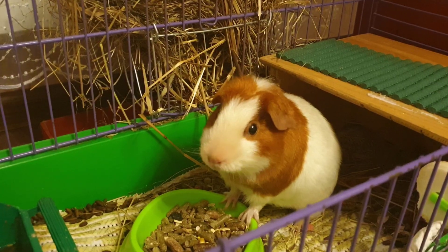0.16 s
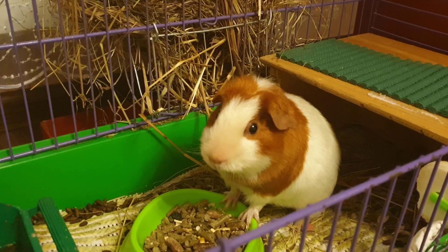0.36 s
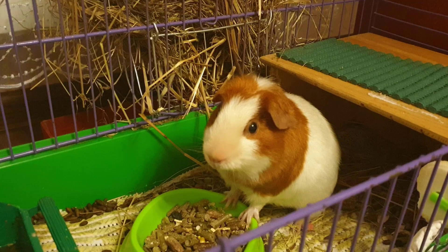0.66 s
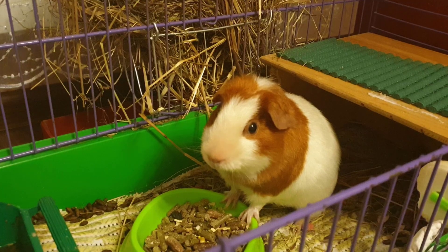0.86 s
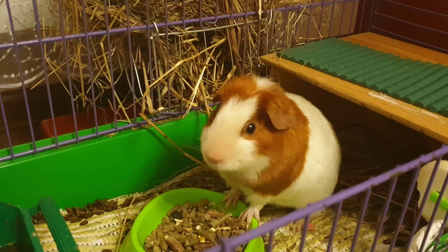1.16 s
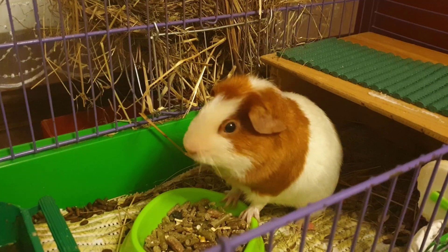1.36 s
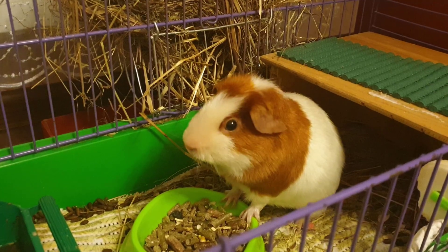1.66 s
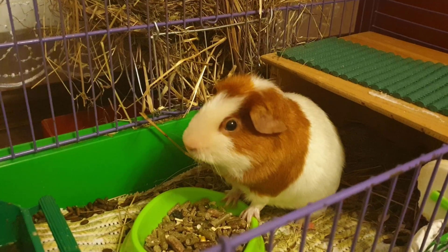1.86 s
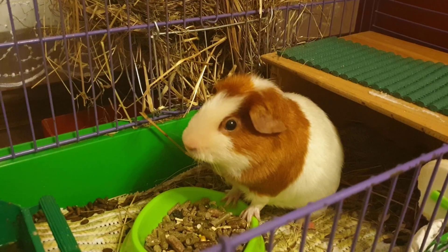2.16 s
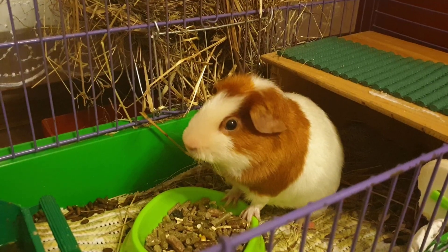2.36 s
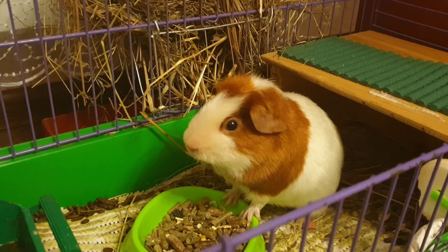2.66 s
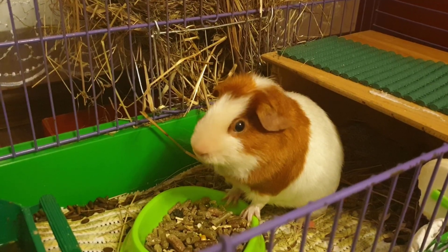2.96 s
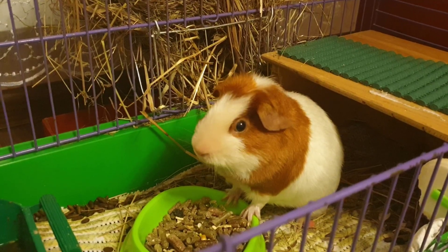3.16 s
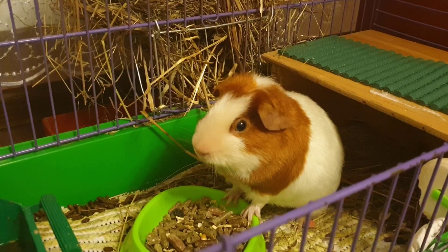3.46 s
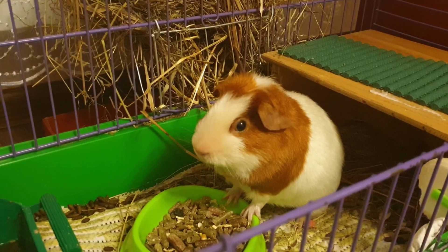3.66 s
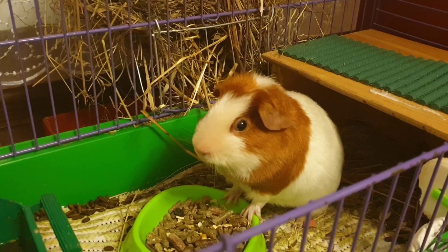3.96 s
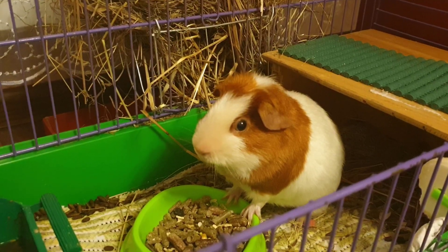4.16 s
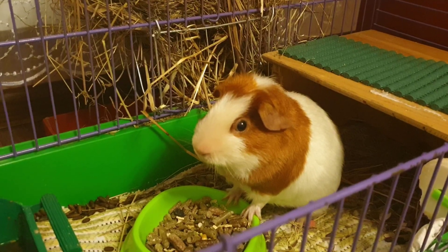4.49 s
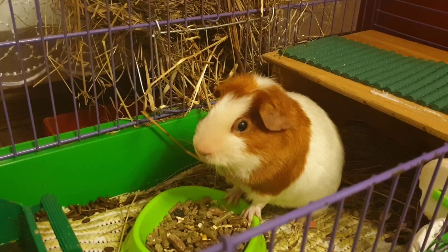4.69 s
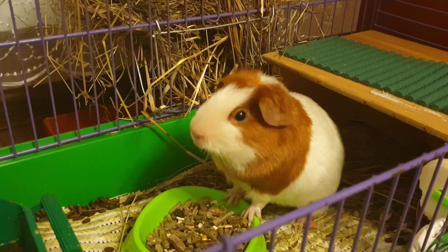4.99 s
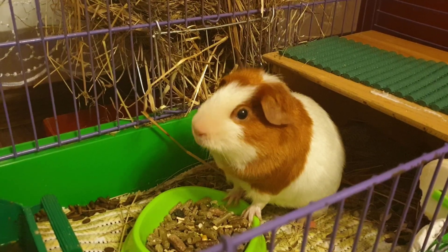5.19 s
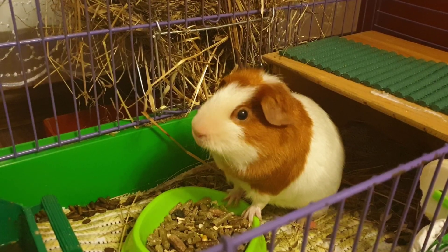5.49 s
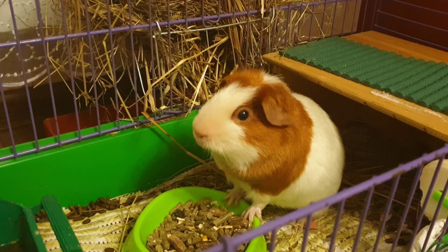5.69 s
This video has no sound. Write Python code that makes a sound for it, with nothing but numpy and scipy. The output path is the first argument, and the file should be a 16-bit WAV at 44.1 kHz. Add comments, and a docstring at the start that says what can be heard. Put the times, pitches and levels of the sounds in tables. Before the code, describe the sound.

Rapid guinea pig squeaks come roughly every half second, starting mid-call. Each leaps upward from hum to bright yelp; the early ones climb high and whistle, several later ones are clipped. Cage and room echoes briefly linger after them. Soft scratchy rubbing, like dry bedding being brushed, comes and goes throughout, with two faint hollow hoots near the end. Low room noise lies underneath, captured close in stereo.

```python
"""In a small, still room, a low rumble and a faint mains hum lie under everything; the rumble swells once, early on.
A guinea pig begs for food in its cage: thirteen wheeks in a row, the first already under way at the start.
Each wheek is a stack of sine waves: a low, nasal hum slides up, through a mouth resonance, into a high cry.
Some end in a thin whistle; echoes from cage and room, made of fading noise, let the calls linger.
All along, something dry is rubbed in uneven strokes of coloured noise, and near the end it softly hoots twice."""
import sys
import numpy as np
from scipy import signal
from scipy.fft import rfft, irfft, next_fast_len
from scipy.io import wavfile
from scipy.ndimage import uniform_filter1d, map_coordinates

SR = 44100
rng = np.random.default_rng(int(sys.argv[2]) if len(sys.argv) > 2 else 0)


def store_wav(level_fs):
    """Save 16-bit WAV to argv[1]."""
    pcm = np.round(np.clip(np.atleast_2d(level_fs), -1, 1) * 32767)
    wavfile.write(sys.argv[1], SR, pcm.T.astype(np.int16))


N = 257400
TIME = np.arange(N) / SR   # seconds

# Background noise of the still room: [f/Hz, density level/dB before the rumble is scaled as a whole]
RUMBLE_COLOUR = [(20, -9), (35, -3), (55, 1), (95, -3), (150, -8.5), (250, -15.5), (450, -20.5),
                 (1000, -24), (3000, -33), (15000, -35)]
# How alike left and right are in sounds spread through the room: [f/Hz, correlation -1 to 1]
LIKENESS = [(40, 0.88), (300, 0.65), (700, 0.14), (1400, -0.27), (2500, 0.15), (5000, 0.0036),
            (15000, 0.062)]
# A wheek is a low hum that lifts, may dwell on a shelf, leaps to a loud yelp, climbs, and may end in a whistle.
# One row per wheek: [start t/s, time constant of the lift t/s,
#  (hum, shelf, yelp, climb, whistle) lengths t/s,
#  (onset, settled hum, end of lift, start of yelp, end of yelp, top of climb, ceiling of whistle) f/Hz,
#  effort in (hum, yelp, top) level/dB, extra second partial in the hum level/dB]
WHEEKS = [ (-.2, .02, (.119, 0, .04, .062, .096), (600, 570, 760, 1050, 1250, 2780, 3770), (0, 3, 2.8), 0),
          (.302, .027, (.116, 0, .033, .083, 0), (625, 504, 757, 1044, 1200, 2760, 2760), (1.2, 1.5, .5),
          -5), (.7, .025, (.129, 0, .034, .054, .05), (679, 510, 820, 1080, 1460, 2780, 3450), (0, 2.5, .5),
          -5), (1.16, .032, (.151, 0, .031, .082, .033), (614, 509, 820, 980, 1368, 2800, 3500),
          (1, 2.5, 1.5), -5.5), (1.945, .02, (.127, .06, .022, .04, 0),
          (455, 540, 680, 1052, 1110, 1780, 1780), (1.5, .5, -3.5), -3.5),
          (2.432, .04, (.158, .062, .04, .066, .032), (520, 520, 790, 1320, 1350, 2860, 3560),
          (-.5, .5, -3), -2.5), (2.982, .027, (.127, 0, .058, .036, .025),
          (627, 522, 760, 980, 1129, 2080, 2500), (-.5, 1.4, -5.5), 1),
          (3.482, .026, (.091, 0, .033, .035, 0), (567, 488, 800, 1290, 1074, 1200, 1200), (-3.5, -1, -2),
          -1), (3.912, .015, (.074, 0, .037, .014, 0), (529, 508, 790, 1199, 1196, 1255, 1255),
          (-2, -4, -4.5), -2), (4.286, .014, (.168, 0, .02, .038, 0),
          (528, 617, 840, 1140, 1272, 1700, 1700), (-.5, 1.7, -2), 0),
          (4.755, .016, (.138, 0, .037, .093, .043), (553, 600, 740, 980, 1170, 2760, 3480), (-.5, 3, 1.5),
          1.5), (5.278, .028, (.124, 0, .005, .034, .03), (590, 540, 763, 1176, 1255, 1990, 2400),
          (-1.5, .6, 1.5), 2), (5.688, .018, (.112, 0, .005, .036, 0),
          (564, 606, 872, 1112, 1222, 1686, 1686), (0, 2.1, 0), .5), ]
# The voice swells where its pitch meets a resonance:
# [pitch f/Hz, fundamental level/dB before effort, second partial re fundamental level/dB before the nasal extra]
VOICE = [(480, -50.5, -10.6), (560, -48.5, -4.7), (610, -53, 3.8), (670, -61, 1), (780, -54, -18),
         (900, -49.5, -25), (1050, -42.5, -24), (1250, -43.5, -20), (1380, -54.5, -6), (1700, -58.5, -7),
         (2100, -53.5, -24), (2600, -52, -22), (2900, -51, 4), (3020, -44.5, -1), (3130, -40.5, -15),
         (3500, -40, -19)]
# The yelp near 1100 Hz is almost pure, the climb above it buzziest:
# [pitch f/Hz, third partial re fundamental level/dB before the throat colours it]
BUZZ = [(480, -50), (600, -23.5), (800, -21.5), (1100, -44), (1400, -20), (1800, -7), (2200, -19.5),
        (3000, -24), (3500, -13.5)]
# Resonances of nose and mouth that colour the third and higher partials: [f/Hz, level/dB]
THROAT = [(1500, -2.5), (1800, -1), (2300, 0.5), (2800, -11), (4000, -3), (4800, -24), (5500, -3),
          (6100, 7.5), (7300, -22), (8200, -8), (9100, -5), (10700, -3), (14000, -6)]
# The voice is steady in the hum, unsteady and airy in the climb: [pitch f/Hz, strain 0 to 1]
STRAIN = [(600, 0), (750, .5), (1100, .2), (1500, 1), (2600, 1), (3100, .4)]
# Near echoes from the cage walls: [f/Hz, re direct sound level/dB before the direct sound's own trim]
CAGE_ECHO = [(400, -13), (1100, -15), (2000, -8), (3200, -19.5), (6000, -16), (14000, -17)]
# The room's longer answer: [f/Hz, re direct sound level/dB before the direct sound's own trim]
ROOM_ECHO = [(400, -20.5), (600, -10.5), (1100, -11.5), (2000, -3), (3200, -8), (6000, -15), (14000, -13)]
# Rubbing strokes: [peak t/s, swell by 20 dB t/s, fade by 20 dB t/s,
#  level/dB before the overall rubbing gains, weight of the hollow low part level/dB]
STROKES = [(.04, .2, .13, -62, 7), (.186, .4, .17, -57, -15), (.516, .3, .11, -49, -2),
           (.625, .2, .37, -43, 0), (.823, .16, .35, -48, 2), (1.07, .21, .32, -49.5, -13),
           (1.462, .16, .37, -55, -14), (1.681, .24, .34, -50.4, -7), (2.042, .5, .27, -64, -21),
           (2.19, .2, .14, -72, -12), (3.03, .25, .49, -60.4, -12), (3.45, .12, .9, -56.5, -7),
           (3.675, .26, .28, -50, 1), (3.866, .27, .33, -50.6, -1), (4.05, .36, .27, -45, -2),
           (4.23, .16, .58, -48.5, -3), (4.606, .27, .42, -49.6, -5), (5.151, .45, .24, -49, 4.5),
           (5.309, .07, .27, -45, -1), (5.637, .46, .8, -46.8, 1), (5.813, .47, .21, -49, 5)]
# Bright friction hiss: [f/Hz, density level/dB before scaling as a whole]
FRICTION = [(300, -32), (1000, -11.5), (2000, -4.5), (4000, -4.5), (5500, 0.5), (7100, 2), (8000, -4),
            (11000, -4.5), (13500, -8), (15500, -21.5)]
# Hollow body of the rubbed thing: [f/Hz, density level/dB before scaling as a whole]
HOLLOW = [(150, -24), (270, -12), (450, -7.5), (720, -1.5), (950, -3.5), (1500, -4), (2800, -3),
          (4500, -6.5), (8000, -32.5)]
# A stroke catches and hoots softly: [peak t/s, pitch f/Hz, bandwidth f/Hz, peak level/dB, length t/s]
HOOTS = [(5.121, 723, 90, -56, 0.019), (5.172, 680, 90, -67, 0.12)]

MAINS_HZ, MAINS_DB = 60, -78.5
RUMBLE_DB, RUMBLE_WANDER_DB, RUMBLE_WANDER_HZ = -71.2, .6, 2.5   # level; depth and rate of its slow wander
SWELL_S, SWELL_LENGTH_S, SWELL_DB = .68, .15, 6.5   # the rumble swells once
SETTLE_S, LEAP_S = .06, .021   # the hum settles; the leap from the break to the yelp
SHELF_HZ_PER_S, WHISTLE_RISE_S = 1900, .055   # the shelf slopes up; the whistle creeps up to a ceiling
ATTACK_S, RELEASE_S, PUSH_S = .022, .006, .03   # effort turns from hum to yelp PUSH_S before the break
ROOM_T60_S = 0.38   # time for the room echoes to fade by 60 dB
CUTOFF_HZ = 15650


def from_db(db):
    """Turn decibels into a gain."""
    return 10 ** (np.asarray(db) / 20)


def rms_one(x):
    """Scale a sound to an average strength (rms) of 1."""
    return x / np.sqrt(np.mean(x ** 2) + 1e-20)


def at_hz(points, hz):
    """Read a two-column table between its rows, with pitch spaced as the ear hears it (logarithmically)."""
    table = np.array(points)
    return np.interp(np.log(np.maximum(hz, 1)), np.log(table[:, 0]), table[:, 1])


def follow(rows, at):
    """Read the other columns of a table at the given values of its first column."""
    first, *columns = np.transpose(rows)
    return [np.interp(at, first, column) for column in columns]


def drift(rate_hz, size):
    """Slow random wander with spread 1: noise smoothed twice, so only slow changes remain."""
    r = np.exp(-2 * np.pi * rate_hz / SR)
    noise = rng.standard_normal(size + SR // 2)   # the extra half second lets the filter settle
    wander = signal.lfilter([1], [1, -2 * r, r * r], noise)
    return rms_one(wander)[-size:]


def stereo_noise(spectrum, size=N):
    """Coloured noise on two channels: sharing more of the middle than the side makes them more alike."""
    padded = next_fast_len(size)
    hz = np.arange(padded // 2 + 1) * SR / padded
    alike = np.clip(at_hz(LIKENESS, hz), -1, 1)
    mid, side = rfft(rng.standard_normal((2, padded))) * from_db(at_hz(spectrum, hz))
    left_right = np.sqrt(1 + alike) * mid + np.sqrt(1 - alike) * side * [[1], [-1]]
    return irfft(left_right, padded)[:, :size] / np.sqrt(2)


def still_room():
    """Low noise that wanders a little in level, with a faint mains hum as one pure tone."""
    hum = from_db(MAINS_DB) * np.sqrt(2) * np.sin(2 * np.pi * MAINS_HZ * TIME)
    swell_db = SWELL_DB * np.exp(-((TIME - SWELL_S) / SWELL_LENGTH_S) ** 2)
    wander_db = RUMBLE_WANDER_DB * drift(RUMBLE_WANDER_HZ, N)
    rumble = from_db(RUMBLE_DB + swell_db + wander_db) * rms_one(stereo_noise(RUMBLE_COLOUR))
    return rumble + hum


def wheek_pitch(t, lengths_s, lift_s, pitches_hz):
    """The hum settles and lifts ever faster; shelf, leap, yelp and climb then glide up to the whistle."""
    onset, settled, lifted, yelp, yelp_end, top, ceiling = pitches_hz
    ends = np.cumsum(lengths_s)
    hum = settled + (onset - settled) * np.exp(-t / SETTLE_S)
    lift = np.expm1(np.minimum(t, ends[0]) / lift_s) / np.expm1(ends[0] / lift_s)   # from 0 to 1
    shelf_end = lifted + SHELF_HZ_PER_S * lengths_s[1]
    glide = np.exp(np.interp(t, ends, np.log([lifted, shelf_end, yelp, yelp_end, top])))
    creep = (ceiling - top) * (1 - np.exp(-np.maximum(t - ends[-1], 0) / WHISTLE_RISE_S))
    return np.where(t < ends[0], hum + (lifted - hum) * lift, glide + creep)


def wheek(pitch, effort_db, nasal_db, jitter=0.004, waver=0.01, shimmer_db=1.0, strain_db=1.6, air_db=-24,
          upper_step_db=-5, rasp_db=2.0, frail_db=-20, count=5):
    """One call: partials at multiples of a sliding, slightly unsteady pitch; the upper ones flutter."""
    size = len(pitch)
    t = np.arange(size) / SR
    strain, = follow(STRAIN, pitch)
    unsteady = 1 + (jitter + waver * strain) * drift(110, size)
    pitch = uniform_filter1d(pitch, size=300) * unsteady   # smoothing rounds the corners of the glide
    level_db, second_db = follow(VOICE, pitch)
    level_db = level_db + effort_db
    second_db = second_db + nasal_db
    phase = 2 * np.pi * np.cumsum(pitch) / SR
    # the second partial is steady where it is strong and breaks up where it is weak
    frailty = np.clip(second_db / frail_db, 0, 1)
    dropout_db = 2 * rasp_db * frailty * np.abs(drift(45, size))
    tone = np.sin(phase) + from_db(second_db - dropout_db) * np.sin(2 * phase)
    for k in range(3, count + 1):
        partial_db = at_hz(BUZZ, pitch) + upper_step_db * (k - 3) + at_hz(THROAT, k * pitch)
        tone += from_db(partial_db + rasp_db * drift(45, size)) * np.sin(k * phase)
    voiced = np.clip(np.minimum(t / ATTACK_S, (t[-1] - t) / RELEASE_S), 0, 1)
    air = from_db(air_db) * strain ** 2 * rng.standard_normal(size)
    flicker_db = (shimmer_db + strain_db * strain) * drift(90, size)
    return (np.sqrt(2) * tone + air) * voiced * from_db(level_db + flicker_db)


def guinea_pig():
    """All the calls in a row; how hard the animal pushes changes from stage to stage."""
    out = np.zeros(N)
    for start, lift_s, stages_s, pitches_hz, efforts_db, nasal_db in WHEEKS:
        hum_s, shelf_s, yelp_s, climb_s, whistle_s = stages_s
        hum_db, yelp_db, top_db = efforts_db
        lengths_s = [hum_s, shelf_s, LEAP_S, yelp_s, climb_s]
        # the times when the break, yelp and climb begin and when the top is reached
        breaks, yelps, climbs, tops = np.cumsum(lengths_s)[1:]
        t = np.arange(int((tops + whistle_s) * SR)) / SR
        effort_db = np.interp(t, [breaks - PUSH_S, yelps, climbs, tops], [hum_db, yelp_db, yelp_db, top_db])
        nasal = np.interp(t, [breaks - PUSH_S, breaks], [nasal_db, 0])
        call = wheek(wheek_pitch(t, lengths_s, lift_s, pitches_hz), effort_db, nasal)
        at = int(start * SR) + np.arange(len(t))
        heard = (at >= 0) & (at < N)
        out[at[heard]] += call[heard]
    return out


def direct(voice, lag_s=0.0001, pan_db=0.3, level_db=-0.5):
    """The animal sits a little to the left, so the right side hears it later and softer."""
    later = map_coordinates(voice, [np.arange(N) - lag_s * SR], order=3)
    return np.array([voice, later]) * from_db([[level_db + pan_db], [level_db - pan_db]])


def echoes(voice, colour, t60_s, first_echo_s):
    """Dense reflections, made of fading noise, that build up quickly and die away."""
    t = TIME[:SR * 2 // 3]
    build_up = np.clip(t / first_echo_s - 1, 0, 1)   # silent until the first echo
    decay = from_db(-60 * t / t60_s) * build_up
    response = stereo_noise(colour, size=len(t)) * decay / np.sqrt(np.sum(decay ** 2))
    return signal.fftconvolve(voice[None], response, axes=1)[:, :N]


def rubbing(friction_db=-2, hollow_db=-7.0, flutter_db=0.7):
    """Countless tiny slips merge into a hiss per stroke, which also stirs the hollow body by its own weight."""
    friction_power, hollow_power = np.zeros(N), np.zeros(N)
    for s, swell_s, fade_s, level_db, weight_db in STROKES:
        away_from_peak = np.maximum((s - TIME) / swell_s, (TIME - s) / fade_s)
        power = from_db(level_db - 20 * away_from_peak) ** 2
        friction_power += power
        hollow_power += power * from_db(weight_db) ** 2
    friction = from_db(friction_db) * np.sqrt(friction_power) * rms_one(stereo_noise(FRICTION))
    hollow = from_db(hollow_db) * np.sqrt(hollow_power) * rms_one(stereo_noise(HOLLOW))
    return from_db(flutter_db * drift(25, N)) * (friction + hollow)


def hoots():
    """Noise through one narrow resonance, swelling and fading briefly, gives each soft hoot."""
    out = np.zeros(N)
    for s, hz, width_hz, level_db, length_s in HOOTS:
        r = np.exp(-np.pi * width_hz / SR)
        resonance = [1, -2 * r * np.cos(2 * np.pi * hz / SR), r * r]
        ring = signal.lfilter([1, 0, -1], resonance, rng.standard_normal(N))
        swell = np.exp(-((TIME - s) / length_s) ** 2)
        out += from_db(level_db) * rms_one(ring) * swell
    return out


def scene():
    """Add the background, the voice with its echoes, the rubbing and the hoots."""
    voice = guinea_pig()
    cage = echoes(voice, CAGE_ECHO, t60_s=0.17, first_echo_s=0.0035)
    room = echoes(voice, ROOM_ECHO, t60_s=ROOM_T60_S, first_echo_s=0.0047)
    return still_room() + direct(voice) + cage + room + rubbing() + hoots()


def record(dry):
    """Cut the highest treble steeply with a low-pass filter."""
    low_pass = signal.ellip(12, .1, 80, CUTOFF_HZ, fs=SR, output="sos")   # ripple 0.1 dB, cut by 80 dB
    return signal.sosfilt(low_pass, dry)


dry = scene()
out = record(dry)
store_wav(out)
```